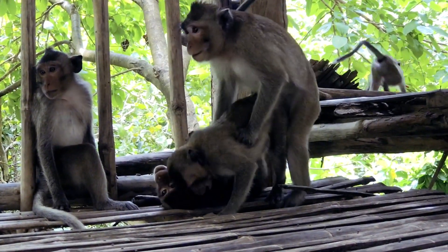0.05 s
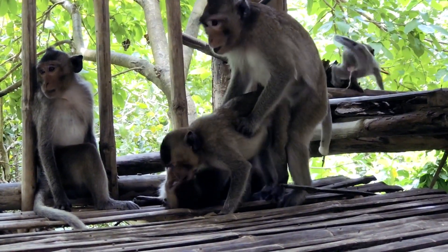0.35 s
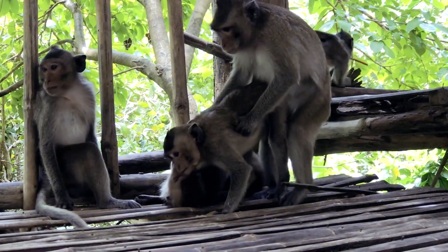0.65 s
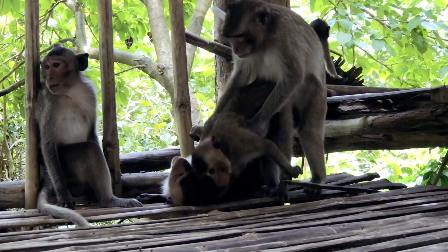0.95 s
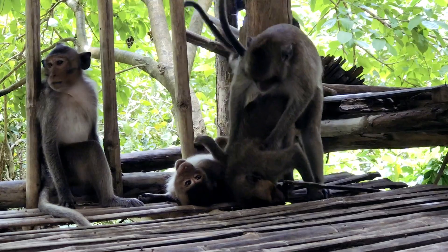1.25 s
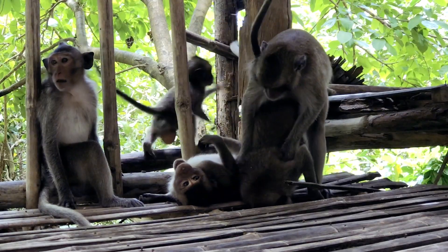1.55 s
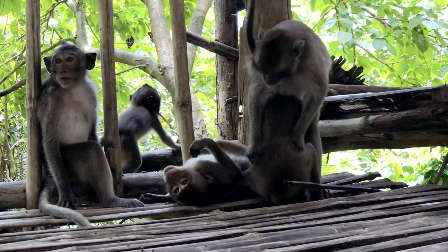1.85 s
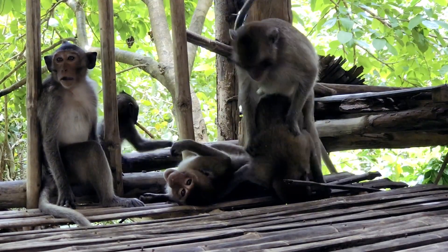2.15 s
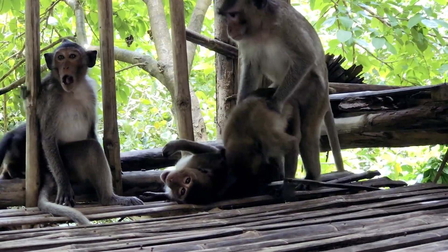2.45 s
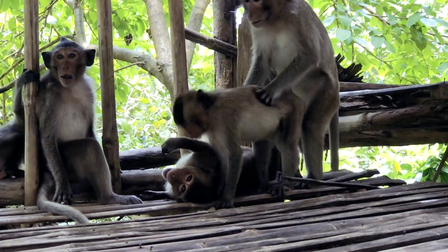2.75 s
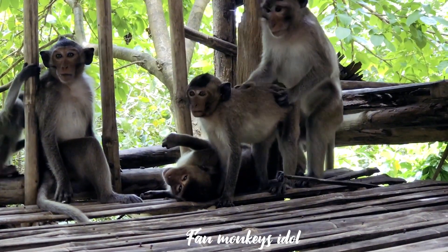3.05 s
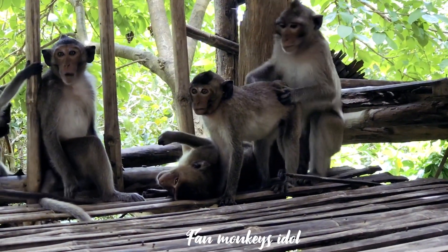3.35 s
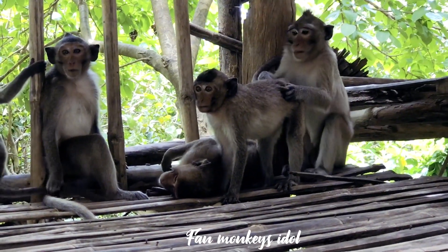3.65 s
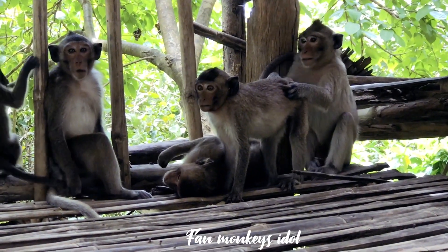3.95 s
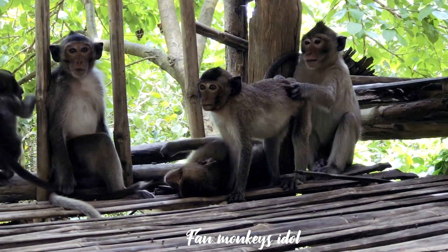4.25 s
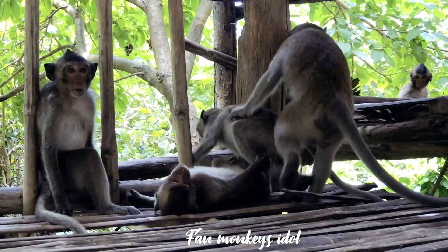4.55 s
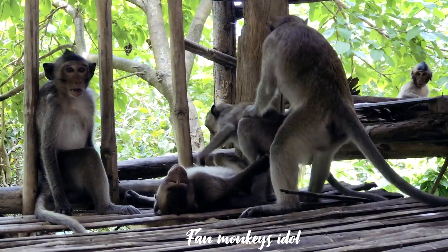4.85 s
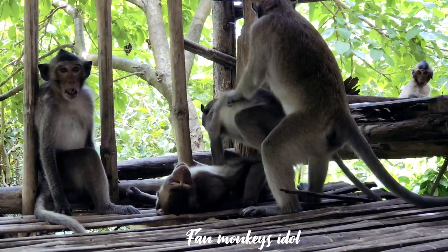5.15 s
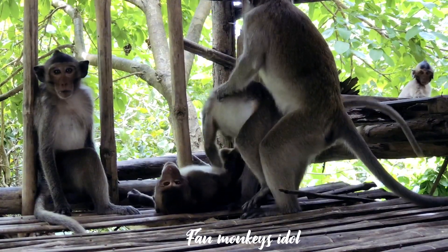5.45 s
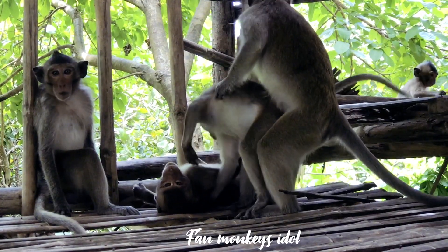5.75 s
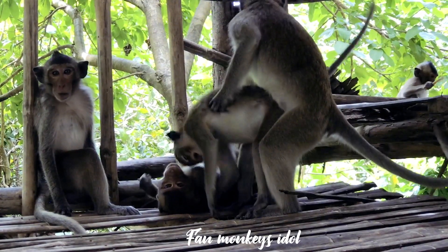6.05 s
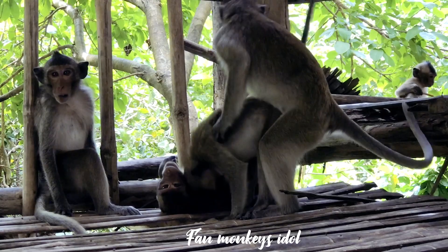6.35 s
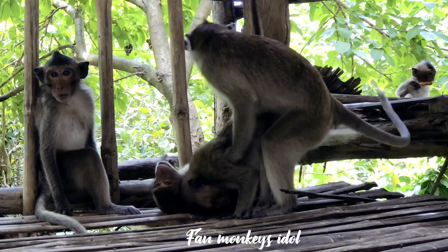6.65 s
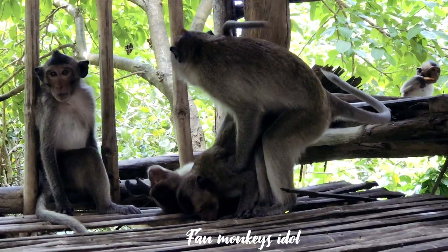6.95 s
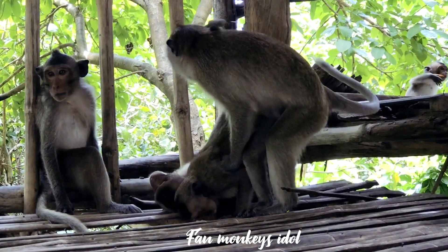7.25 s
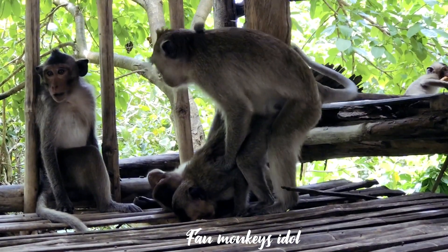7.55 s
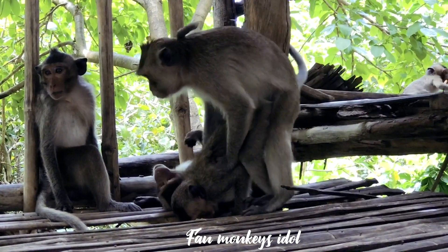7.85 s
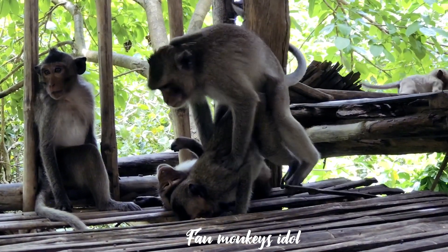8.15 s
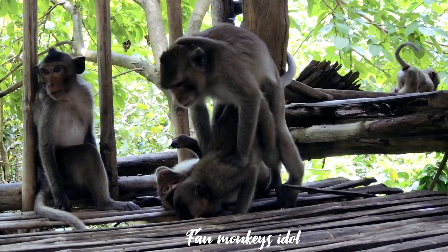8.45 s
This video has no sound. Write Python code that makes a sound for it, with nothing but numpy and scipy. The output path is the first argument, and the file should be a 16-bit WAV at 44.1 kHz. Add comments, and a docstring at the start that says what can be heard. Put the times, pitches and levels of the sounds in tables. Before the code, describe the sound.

Short, high chirps from a small animal ring through a forest, with soft cicadas and far birds rattling and whistling.

```python
"""A bamboo shelter in a forest where macaques play. Close by, a small animal repeats a thin rising chirp
that rings among the posts and trees. Cicadas drone at a steady pitch, tymbals beating against a body
resonance, over distant rustle and insect hums. The platform rumbles softly as the monkeys shift their
weight. Farther off, one bird rattles in short bouts and others whistle husky, gliding notes."""
import sys
import numpy as np
from scipy import signal
from scipy.fft import rfft, irfft, next_fast_len
from scipy.io import wavfile
from scipy.ndimage import uniform_filter1d

SR = 44100
rng = np.random.default_rng(int(sys.argv[2]) if len(sys.argv) > 2 else 0)


def waveform_to_disk(signal):
    """Save audio, clipped to [-1, 1], as 16-bit WAV at the path in sys.argv[1]."""
    frames = np.transpose(np.atleast_2d(signal))
    scaled = np.clip(frames, -1, 1) * 32767
    samples = np.round(scaled).astype(np.int16)
    wavfile.write(sys.argv[1], SR, samples)


N = 374409
TIME = np.arange(N) / SR


def undb(db):
    """Decibels to gain."""
    return 10 ** (np.asarray(db) / 20)


def pan(db):
    """Stereo gains for a left-minus-right level."""
    return undb(np.array([[db], [-db]]) / 2)


def add(out, sound, start_s):
    """Mix in at start_s, cropped to the scene."""
    i = int(start_s * SR)
    a, b = max(i, 0), min(i + sound.shape[-1], N)
    if b > a:
        out[..., a:b] += sound[..., a - i:b - i]


def walk(rate_hz):
    """Random steps at rate_hz, smoothed twice; rms 1."""
    hold = int(SR / rate_hz)
    steps = np.repeat(rng.standard_normal(N // hold + 1), hold)
    return unit(uniform_filter1d(uniform_filter1d(steps, hold), hold)[:N])


def unit(x):
    """Scale to rms 1."""
    return x / np.sqrt(np.mean(x ** 2))


def swell(length_s):
    """Half-sine envelope."""
    return np.sin(np.linspace(0, np.pi, int(length_s * SR)))


def stereo_noise(size, side_db):
    """Mid/side white noise; rms 1."""
    mid, side = rng.standard_normal((2, size))
    return unit(mid + undb(side_db) * side * np.array([[1], [-1]]))


def colour(x, spectrum):
    """Filter by (f/Hz, gain/dB) rows; rms 1."""
    hz, db = np.transpose(spectrum)
    size = next_fast_len(N)
    bins_hz = np.arange(size // 2 + 1) * SR / size
    gain = undb(np.interp(np.log(bins_hz + 1), np.log(hz), db))
    return unit(irfft(rfft(x, size) * gain, size)[..., :N])


def resonate(x, hz, width_hz):
    """Two identical resonators in series; rms 1."""
    b, a = signal.iirpeak(hz, hz / width_hz, fs=SR)
    return unit(signal.lfilter(b, a, signal.lfilter(b, a, x)))


def trees(x, t60_s, direct_db, side_db, early_db, early_s):
    """Direct path, early echoes off posts and boards, then scatter from trunks and leaves."""
    t = np.arange(SR * 3 // 4) / SR
    tail = unit(np.exp(-np.log(1000) * t / t60_s))
    early = undb(early_db) * unit(np.exp(-t / early_s))
    response = stereo_noise(len(t), side_db) * np.hypot(tail, early) / np.sqrt(len(t))
    response[:, 0] += undb(direct_db)
    response /= np.sqrt(np.sum(response ** 2) / 2)
    return signal.fftconvolve(x[None], response, axes=1)


# Throat response: f/Hz, gain/dB
THROAT_RESPONSE = [(3300, -5), (4100, -1), (4600, 1), (5150, -2), (5850, 3.5), (6200, 0), (6500, -5),
                   (6900, -6)]


def chirp(length_s, start_hz, top_hz, bend, swell_db,
          fall_s=.016, end_hz=3750, waver=.01291, attack_s=.0091, release_s=.002, tire_db=3):
    """Gain and phase of a whistle: effort lifts pitch and level, then tires; the pitch snaps down."""
    t = np.arange(int(length_s * SR)) / SR
    crest_s = length_s - fall_s
    rise = 1 - np.clip(1 - t / crest_s, 0, 1) ** bend
    fall = np.sin(np.pi / 2 * np.clip((t - crest_s) / fall_s, 0, 1) ** 2) ** 2
    hz = start_hz + (top_hz - start_hz) * rise - (top_hz - end_hz) * fall
    phase = 2 * np.pi * np.cumsum(hz * (1 + waver * walk(600)[:len(t)])) / SR
    gate = np.clip(t / attack_s, 0, 1) * np.clip((length_s - t) / release_s, 0, 1)
    effort_db = swell_db * (hz - top_hz) / (top_hz - start_hz) - tire_db * (t / length_s - .5)
    throat_db = np.interp(hz, *np.transpose(THROAT_RESPONSE))
    return gate * undb(effort_db + throat_db), phase


# Near chirps: t/s, length/s, start f/Hz, top f/Hz, bend (1 = straight rise), rel. level/dB,
# swell/dB, rel. octave level/dB, L-R/dB
NEAR_CHIRPS = [ (-0.075, .08, 3700, 6544, 1.6, -25, 10.4, -24, -1),
               (0.675, .078, 3750, 6800, 1.3, -24, 17, -33, -5.4),
               (1.162, .090, 3700, 6200, 2.0, -23.3, 6.5, -28, -1),
               (2.731, .098, 3500, 6450, 2.1, -19, 13, -25, 2.3),
               (4.261, .088, 4000, 6300, 2.5, -20.7, 6.5, -31, -1),
               (4.332, .04, 4730, 6570, 2.2, -23.5, 1.5, -26, -2),
               (6.219, .089, 3750, 6100, 2.1, -23, 4.5, -29, -.6),
               (7.542, .075, 3700, 6650, 1.3, -26.3, 14, -30, -5.5),
               (8.449, .088, 3260, 5952, 4.07, -21, 11.7, -25, 4), ]


def chirping_animal(bright_db=1, rasp_db=-40, t60_s=.4, gain_db=-.85, echo_s=.062, echo_db=-35):
    """Near-pure chirps, thrown back by trees on the right. The animal moves: each has its own echoes."""
    out = np.zeros((2, N))
    rasp = undb(rasp_db) * resonate(rng.standard_normal(N), hz=2300, width_hz=3000)
    for at_s, length_s, start_hz, top_hz, bend, db, swell_db, octave_db, pan_db in NEAR_CHIRPS:
        gain, phase = chirp(length_s, start_hz, top_hz, bend, swell_db)
        octave = undb(octave_db + bright_db) * np.sin(2 * phase)
        call = gain * (np.sin(phase) + np.sqrt(gain) * octave + rasp[:len(gain)])
        facing_db = db + 19  # loud chirps face the listener: more direct sound
        heard = trees(call, t60_s, direct_db=facing_db, side_db=-4.5, early_db=-2, early_s=.013)
        echo = trees(gain * np.sin(phase), t60_s, direct_db=-20, side_db=-3, early_db=2, early_s=.013)
        add(out, heard * undb(db + gain_db) * pan(pan_db), at_s)
        add(out, echo * undb(echo_db) * pan(-4.5), at_s + echo_s)
    return out


# Cicada chorus spectrum: f/Hz, rel. level/dB
CHORUS_SPECTRUM = [(6200, -46), (6520, -19.5), (6750, 0.5), (7050, -5), (7350, -0.5), (7650, -6.5),
                   (7850, 3.5), (8050, -15), (8300, -13.5), (9000, -11.5), (10000, -15), (10800, -21),
                   (11500, -38), (15000, -36)]


def cicadas(beat_hz=70, drift=.0025, ring_hz=7790, ring_width_hz=110,
            solo_depth=.65, chorus_depth=.16, gain_db=-62.5):
    """One cicada's tymbals beat against its shrill body resonance, over a smoother chorus."""
    beat = np.sin(2 * np.pi * np.cumsum(beat_hz * (1 + drift * walk(3.3))) / SR)
    solo = resonate(stereo_noise(N, side_db=1), ring_hz, ring_width_hz) * (1 + solo_depth * beat)
    chorus = colour(stereo_noise(N, side_db=-4.5), CHORUS_SPECTRUM) * (1 + chorus_depth * beat)
    solo_db = -6 + 2 * walk(5.8)
    chorus_db = 2.55 * walk(4.16)
    left, right = undb(solo_db) * solo + undb(chorus_db) * chorus
    return np.array([left, np.roll(right, 1)]) * undb(gain_db) * pan(-1.9)  # left leads by one sample


# Distant rustle spectrum: f/Hz, rel. level/dB
RUSTLE_SPECTRUM = [(30, -2.5), (100, -6), (250, -6.5), (400, -3), (550, -5.5), (800, 0.5), (1250, 7),
                   (1800, 4), (2600, -36), (3300, 2.5), (4200, -10), (5000, -7.5), (6000, -5.5),
                   (8000, -75)]
# Bird haze spectrum: f/Hz, rel. level/dB
HAZE_SPECTRUM = [(1200, -47), (1900, -4.5), (2300, -4), (2750, -4), (3400, -2.5), (4000, -4), (4700, -17),
                 (6500, -27), (11000, -57)]
# Bird haze envelope: t/s, rel. level/dB
HAZE_ENVELOPE = [(0.0, -65), (0.47, -78), (1.15, -78), (1.4, -79), (1.96, -74.5), (2.17, -83.5),
                 (3.34, -79.5), (3.51, -76), (3.88, -79.5), (4.28, -73), (4.49, -80.5), (6.39, -75),
                 (6.92, -72.5), (7.18, -79.5), (7.63, -76), (7.93, -73.5), (8.14, -83), (8.4, -69.5)]
# Insect hums: f/Hz, width/Hz, level/dB, sway/dB
INSECT_HUMS = [(3082, 160, -76, -2), (5630, 240, -83, -3.5)]


def forest(rustle_db=-70.5, rustle_sway_db=.7, haze_gain_db=8, haze_flicker_db=1.2):
    """Swaying distant rustle, a haze of birds too far to tell apart, and thin insect hums."""
    rustle = colour(stereo_noise(N, side_db=-6), RUSTLE_SPECTRUM)
    rustle *= undb(rustle_db + rustle_sway_db * walk(5))
    haze_db = np.interp(TIME, *np.transpose(HAZE_ENVELOPE)) + haze_gain_db
    haze = colour(stereo_noise(N, side_db=-2.5), HAZE_SPECTRUM)
    haze *= undb(haze_db + haze_flicker_db * walk(17))
    hums = sum(resonate(stereo_noise(N, side_db=-4), hz, width_hz) * undb(db + sway_db * walk(3.2))
               for hz, width_hz, db, sway_db in INSECT_HUMS)
    return (rustle + haze + hums) * pan(-.8)


# Bamboo floor spectrum: f/Hz, rel. level/dB
PLATFORM_SPECTRUM = [(20, 11.5), (50, -13), (80, -8.5), (150, -13.5), (350, -14), (900, -16), (3000, -63)]
# Weight shifts: t/s, length/s, level/dB
WEIGHT_SHIFTS = [(0.44, 0.44, -71), (1.1, 0.25, -74), (2.05, 0.64, -88), (4.247, 0.27, -71.5),
                 (4.764, 0.44, -65.5), (5.284, 0.22, -73.5)]


def platform(rest_db=-84.5):
    """The bamboo floor rumbles, swelling each time a monkey shifts its weight."""
    load = np.full(N, undb(rest_db))
    for at_s, length_s, db in WEIGHT_SHIFTS:
        add(load, undb(db) * swell(length_s) ** 2, at_s)
    return colour(stereo_noise(N, side_db=-4), PLATFORM_SPECTRUM) * load * pan(2.1)


def bird_note(length_s, start_hz, end_hz, husk, wobble, at_s):
    """A swelling, fading glide, made husky by fast pitch wobble (husk: fraction of pitch)."""
    envelope = swell(length_s)
    shake = wobble.take(int(at_s * SR) + np.arange(len(envelope)), mode="wrap")
    hz = np.linspace(start_hz, end_hz, len(envelope)) * (1 + husk * shake)
    return envelope * np.sin(2 * np.pi * np.cumsum(hz) / SR)


# Tick rasp spectrum: f/Hz, rel. level/dB
RASP_SPECTRUM = [(500, -70), (1000, -35), (1600, -10), (2100, 0), (2500, -5), (3100, -17), (4500, -40),
                 (8000, -80)]
# Rattle bouts: t/s, length/s, tick rate/Hz, mid-bout rel. level/dB, crescendo/dB
RATTLE_BOUTS = [ (0.067, 0.13, 23.4, -52, 5.5), (0.592, .02, 35, -49, -1), (0.669, 0.03, 44, -52.5, -13),
                (0.756, 0.065, 32.5, -46.5, -6.5), (1.904, 0.15, 32, -54.5, -5), (3.339, .02, 35, -51, 1.5),
                (3.428, .13, 36, -47.5, 6), (3.593, .07, 35, -55.5, -1), (3.864, .02, 35, -54, 4.5),
                (3.972, 0.11, 38.4, -47, 1.5), (4.08, 0.083, 42, -56.5, 1), (4.637, .04, 35, -59.5, 2),
                (5.026, 0.33, 31, -57.5, -3), (6.642, 0.15, 39.5, -48, 12), (7.760, .04, 28, -54.5, -8),
                (7.832, 0.21, 36, -50, -5), (8.373, 0.074, 31.5, -53.5, 14), ]


def rattling_bird(high_hz=2450, low_hz=1800, tick_s=.014, husk=.05,
                  pitch_scatter=.033, scatter_db=1.8, rasp_db=-10, gain_db=-1.6):
    """Bouts of evenly paced ticks, each a hoarse downward sweep, half blurred by the trees."""
    out, wobble = np.zeros(N), walk(2500)
    rasp = undb(rasp_db) * colour(rng.standard_normal(N), RASP_SPECTRUM)
    for bout_s, length_s, rate_hz, db, crescendo_db in RATTLE_BOUTS:
        draws = rng.standard_normal((32, 2))
        for after_s, (pitch_draw, level_draw) in zip(np.arange(0, length_s, 1 / rate_hz), draws):
            at_s = bout_s + after_s - tick_s / 2
            pitch = 1 + pitch_scatter * pitch_draw
            tick_db = db + crescendo_db * (after_s / length_s - .5) + scatter_db * level_draw
            tick = bird_note(tick_s, high_hz * pitch, low_hz * pitch, husk, wobble, at_s)
            edge = swell(tick_s) * rasp.take(int(at_s * SR) + np.arange(len(tick)), mode="wrap")
            add(out, undb(tick_db + gain_db) * (tick + edge), at_s)
    heard = trees(out, t60_s=.56, direct_db=-3.5, side_db=-4, early_db=-7, early_s=.008)
    return heard[:, :N] * pan(-7)


# Far whistles: t/s, length/s, start f/Hz, end f/Hz, level/dB, husk (fraction of pitch)
FAR_WHISTLES = [ (0.20, 0.14, 4470, 3790, -58.5, 0.077), (1.052, 0.018, 3310, 4880, -50.5, .02),
                (1.072, 0.023, 2845, 4530, -49, 0.024), (1.092, 0.015, 3440, 4630, -47, .02),
                (1.125, .035, 3340, 4360, -49.5, 0.12), (1.25, 0.73, 1215, 1215, -71.5, 0.029),
                (1.611, 0.11, 3450, 3940, -63, 0.063), (2.141, 0.14, 1318, 1248, -62.5, 0.076),
                (4.286, .23, 2318, 2127, -60.5, 0.14), (4.875, .14, 2080, 2180, -59, 0.21),
                (5.994, .075, 5430, 4850, -48, 0.081), (6.735, 0.14, 3278, 3270, -50.5, 0.033),
                (6.898, 0.16, 3184, 3048, -52, 0.037), (7.58, 0.57, 3316, 3160, -58.5, 0.2), ]


def far_birds(stray_count=12, stray_hz=(3000, 4000), stray_s=.14, stray_db=-66,
              stray_glide=.1, stray_husk=.1):
    """Single husky whistles and faint random strays, blurred by distance."""
    out, wobble = np.zeros(N), walk(1500)
    strays = []
    for when, height, slope in rng.random((stray_count, 3)):
        start_hz = np.interp(height, (0, 1), stray_hz)
        end_hz = start_hz * (1 + stray_glide * (2 * slope - 1))
        strays.append((when * N / SR, stray_s, start_hz, end_hz, stray_db, stray_husk))
    for at_s, length_s, start_hz, end_hz, db, husk in FAR_WHISTLES + strays:
        add(out, undb(db) * bird_note(length_s, start_hz, end_hz, husk, wobble, at_s), at_s)
    heard = trees(out, t60_s=.61, direct_db=-3, side_db=-5.5, early_db=-9.5, early_s=.024)
    return heard[:, :N] * pan(-3.1)


def scene():
    """Stereo mix at the shelter."""
    return chirping_animal() + rattling_bird() + far_birds() + cicadas() + forest() + platform()


def record(dry):
    """Steep elliptic low-pass."""
    cutoff_hz = 15650
    return signal.sosfilt(signal.ellip(8, .2, 70, cutoff_hz, fs=SR, output="sos"), dry)


dry = scene()
out = record(dry)
waveform_to_disk(out)
```